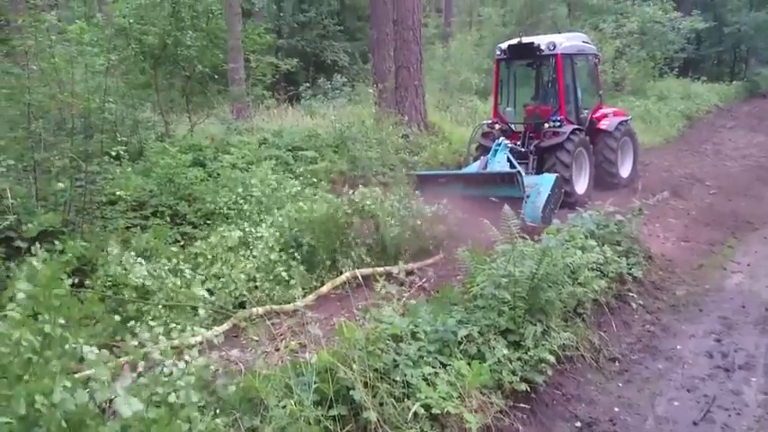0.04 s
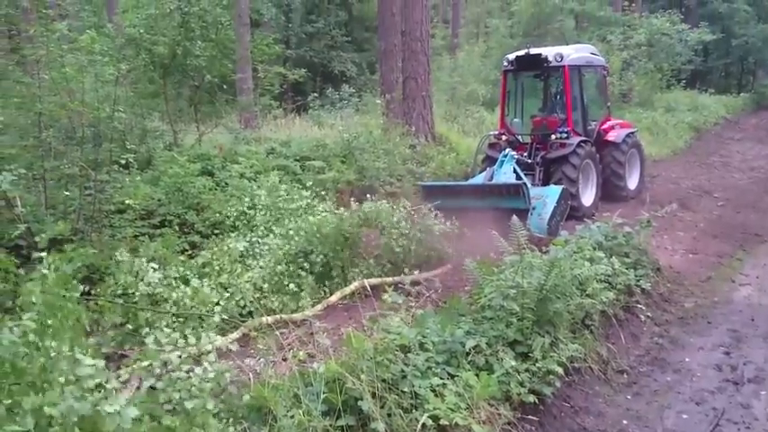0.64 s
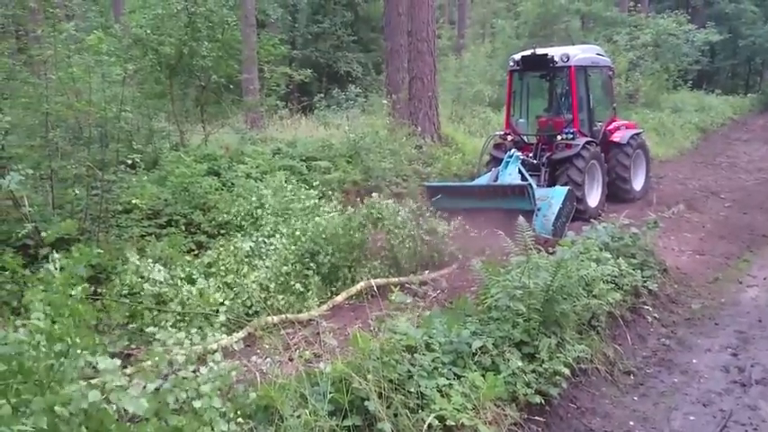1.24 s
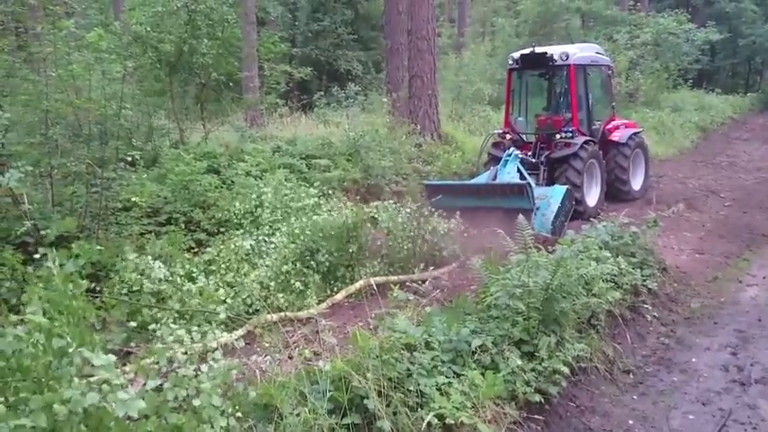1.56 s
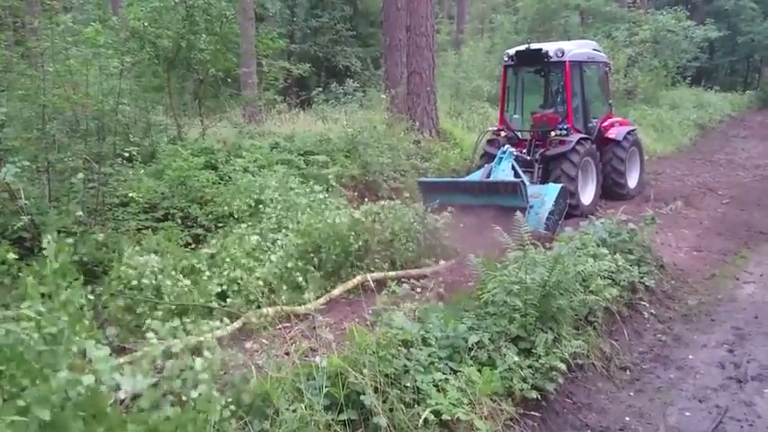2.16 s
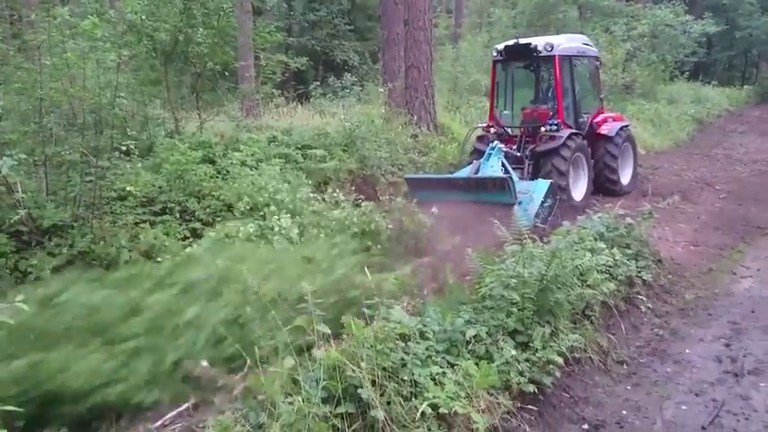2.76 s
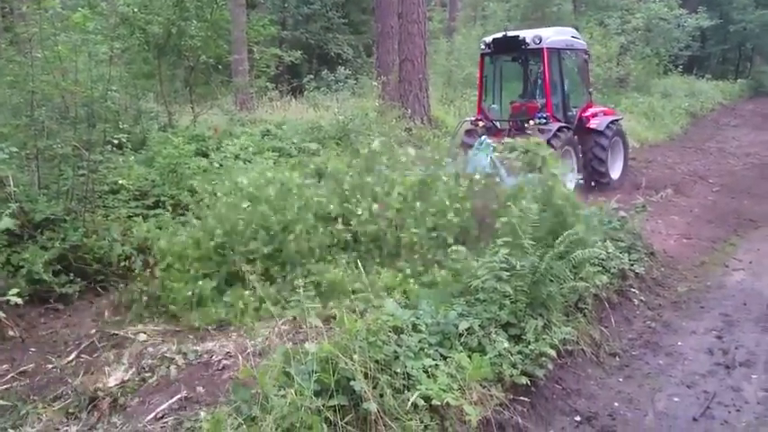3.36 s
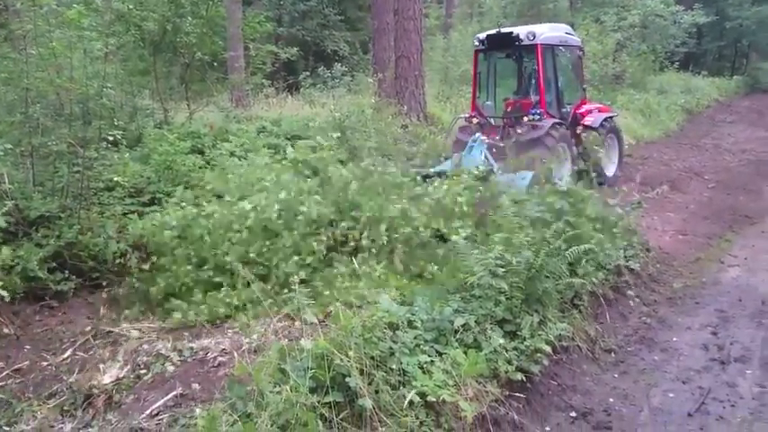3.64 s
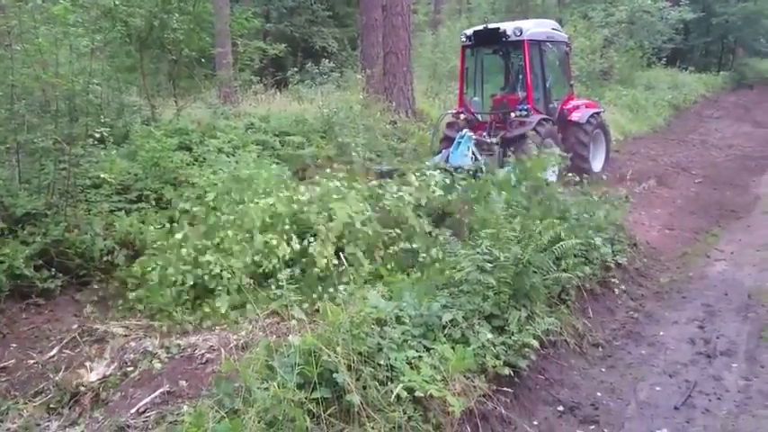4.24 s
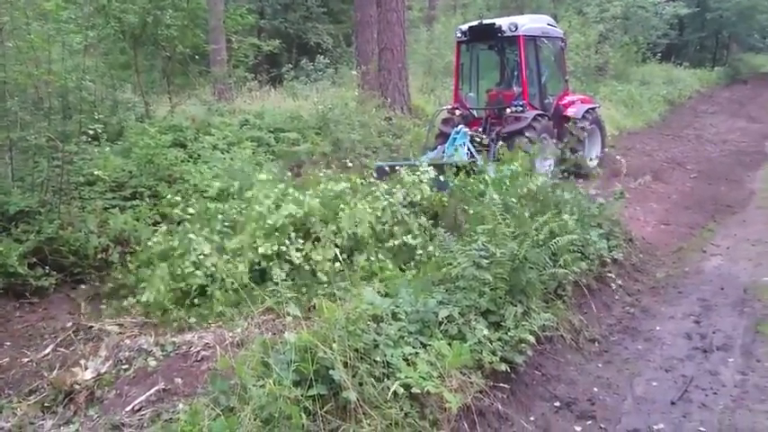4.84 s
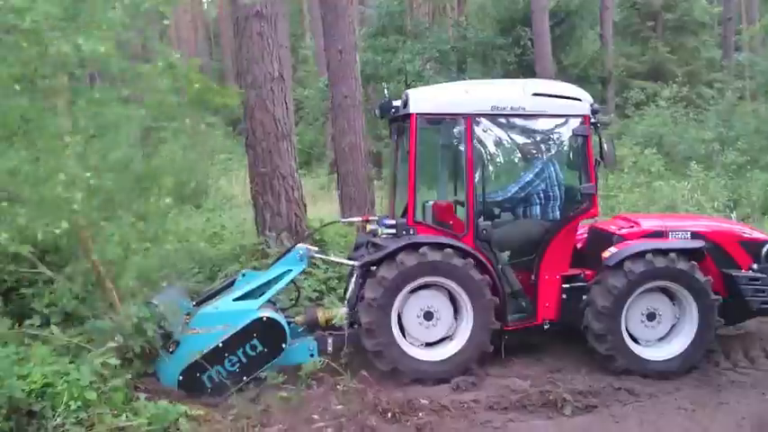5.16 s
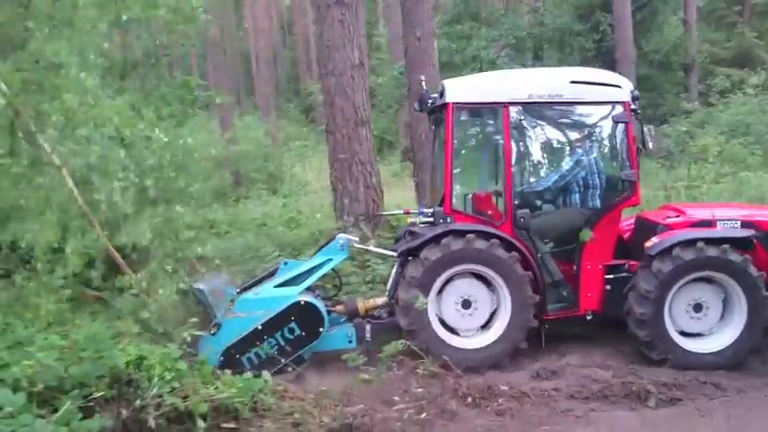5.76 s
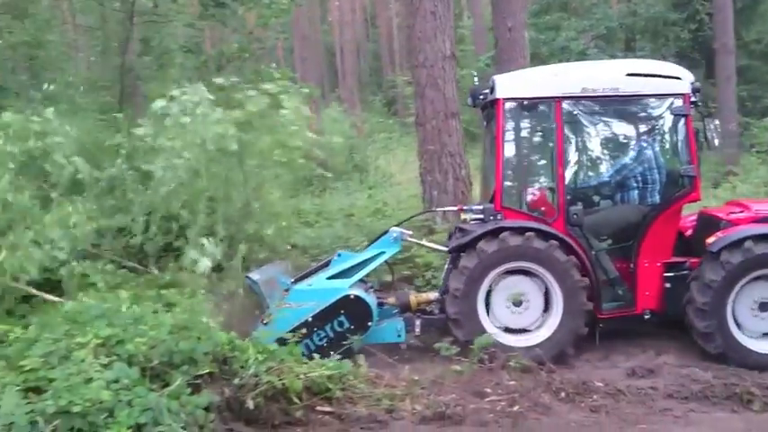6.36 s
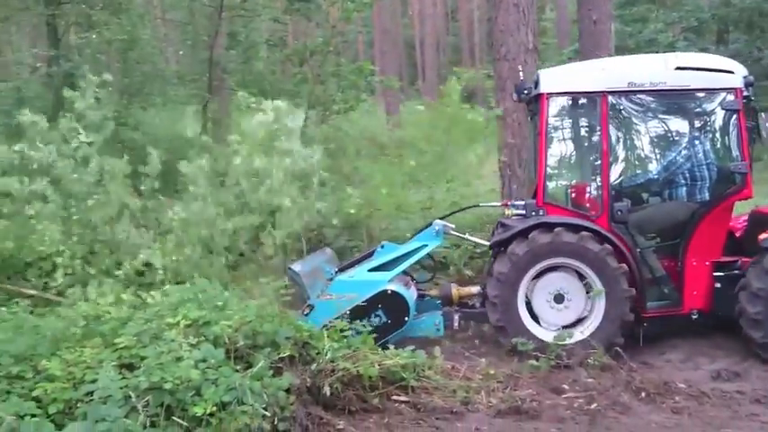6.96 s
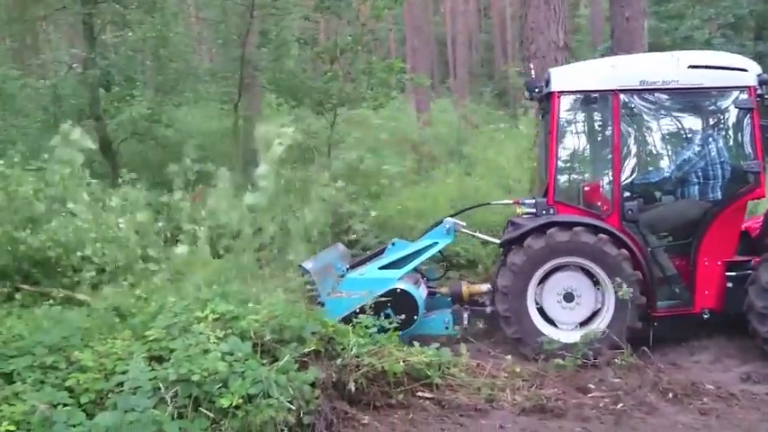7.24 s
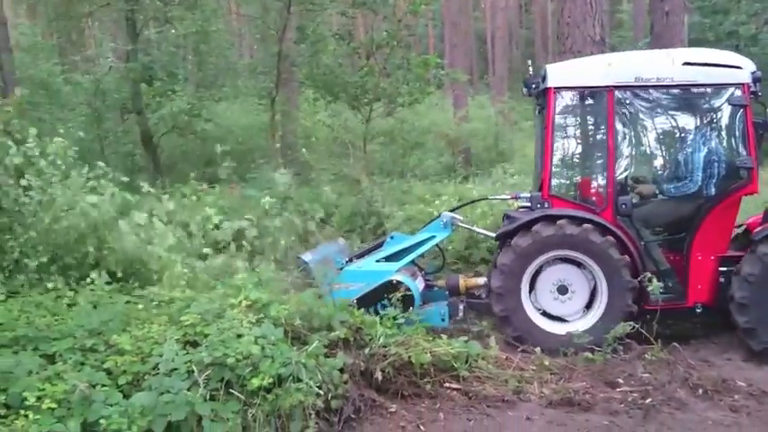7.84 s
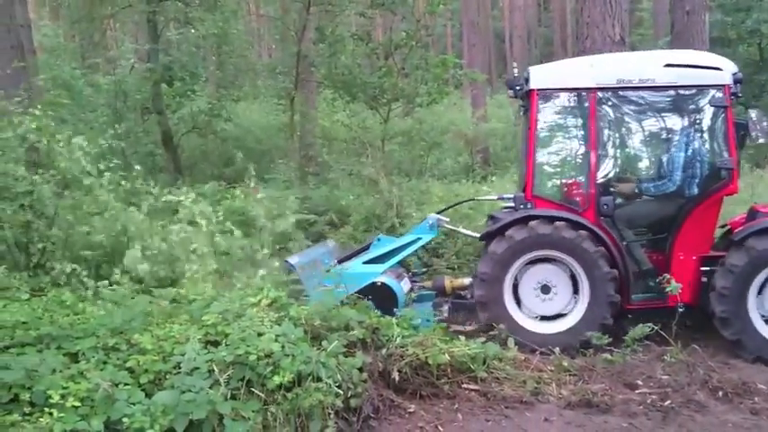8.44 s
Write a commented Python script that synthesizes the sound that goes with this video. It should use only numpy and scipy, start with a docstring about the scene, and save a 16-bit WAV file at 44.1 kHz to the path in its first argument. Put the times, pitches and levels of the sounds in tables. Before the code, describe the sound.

Heard from in front, a tractor's mulcher churns loudly through forest undergrowth, rattling, knocking and splintering wood over a throbbing diesel rumble. The pitch drops as it labours on a branch, with deep thumps and a gear whistle, then climbs back. After a short fade to silence, the microphone is close beside it: a steadier shredding roar, twigs cracking and ripping, and a hollow grinding in the dirt at the end.

```python
"""A small diesel tractor backs a belt-driven flail mulcher into forest brush, the rotor chopping twice
a turn. Around 1 s it draws in a long stick and knocks falling chirps out of it. At 2.5 s a leafy branch
chokes it: amid low booming pulses the engine labours, the gears whine, then the speed recovers. After 5 s
the sound fades out, to return from close beside the machine as a smoother roar with cracking wood and,
last, flails grinding in the soil. Throughout, the two channels are in opposite phase in the bass."""
import sys
import numpy as np
from scipy import signal
from scipy.fft import rfft, irfft, next_fast_len
from scipy.io import wavfile

SR = 44100
rng = np.random.default_rng(int(sys.argv[2]) if len(sys.argv) > 2 else 0)


def bounce(signal):
    """Save signal as a 16-bit WAV file at the path given by the first command-line argument."""
    frames = np.transpose(np.atleast_2d(signal))
    limited = np.clip(frames, -1, 1)
    pcm = np.round(limited * 32767).astype(np.int16)
    wavfile.write(sys.argv[1], SR, pcm)


N = 379701
TIME = np.arange(N) / SR
BESIDE = TIME > 5.4   # we listen from in front, then from beside the machine
FFT_SIZE = next_fast_len(N + 4096)
BIN_HZ = np.maximum(np.arange(FFT_SIZE // 2 + 1) * SR / FFT_SIZE, 1)

# Rotor speed, which engine and gears follow. Each row: time in seconds, turns per second.
ROTOR_SPEED = [(0.0, 25.57), (0.7, 25.88), (1.45, 25.58), (1.8, 25.29), (2.1, 25.44), (2.35, 24.52),
               (2.55, 24.12), (2.85, 20.55), (3.05, 20.45), (3.55, 21.07), (4.2, 24.66), (4.6, 26.25),
               (5.1, 25.54), (6.8, 25.49), (7.3, 25.38), (7.75, 25.47), (8.0, 25.91), (8.61, 25.64)]
# How hard the flails bite. Each row: time in seconds, share of the power that comes in chops (0-1).
BITE = [(0, 0.27), (1.0, 0.63), (1.55, 0.58), (1.95, 0.77), (2.4, 0.4), (2.6, 0.08), (3.7, .12), (4.4, .29),
        (5.0, 0.32), (6.2, 0.04)]
# The two banks of flails. Each row: place in the turn (0-1), relative force in dB on wood, on leaves.
FLAILS = [(.365, 16, 4), (0.885, 14, 4.5)]
# Clumps of brush torn up. Each row: start and hold in seconds, dB added to churn, dB added to wood.
CLUMPS = [(0.0, 0.26, -3.5, 0.5), (1.695, 0.24, 2.5, 1), (1.963, 0.42, -1.5, -0.5), (2.354, 0.072, 0, 0.5),
          (3.465, 0.14, -0.5, 0.2), (6.801, 0.0345, 0.5, 2), (7.062, 0.024, 1, 2), (7.237, 0.033, 3, 1),
          (7.447, 0.08, 1, 1.5), (7.752, 0.32, 2, -0.5), (8.201, .45, .5, -0.5)]
# Chips flung through the leaves. Each row: time in seconds, level in dB.
SPRAY_LEVEL = [(0.1, -27.5), (.3, -30), (.75, -30.5), (.95, -28.5), (1.2, -31.5), (1.45, -32), (1.83, -28),
               (2.2, -31.5), (2.8, -32.5), (3.22, -33), (3.45, -30), (5.1, -32), (6.25, -30.5), (6.8, -31),
               (6.98, -31), (7.5, -31), (7.75, -33), (8.6, -32.5)]
# Sticks snapping. Each row: time in seconds, relative level in dB of the crack, of the woody thud.
SNAPS = [(0.054, -6, -21.5), (0.134, -10.5, -23), (0.29, -7, -28.5), (0.484, -9.5, -19.5),
         (0.544, -10.5, -23), (0.715, -8, -14), (0.792, -8, -19), (0.934, -10.5, -28), (0.973, -7, -24),
         (1.321, -9, -25), (1.827, -4, -21), (1.869, -1, -16.5), (1.954, -1, -29), (1.991, -9, -18.5),
         (2.03, -2, -27.5), (2.07, 1, -27), (2.082, -13, -19), (2.12, -8, -10), (2.164, -12.5, -18),
         (2.202, -7.5, -12), (2.2255, -10, -12.5), (2.2415, -9.5, -9), (2.35, -2.5, -25),
         (2.3905, -3, -23.5), (2.427, -10, -23), (2.452, -8.5, -24.5), (4.9606, -12, -13.5),
         (4.998, -4.5, -21.5), (6.8308, -2.5, -18), (6.985, -9.5, -23), (7.054, -8, -23),
         (7.0685, -20, -21), (7.231, -7.5, -29), (7.343, -22.5, -16.5), (7.44, -6, -19)]
# Flail knocks. Each row: place in the turn (0-1), relative level in dB, low-pass corner in Hz.
KNOCKS = [(.012, 0, 2400), (.56, -4.5, 1100)]
# The colour of the stick's chirp. Each row: frequency in Hz, relative level in dB.
STICK_EQ = [(250, -20), (380, -14.5), (470, -1.5), (600, 4.5), (720, -10.5), (840, -4), (1200, -6.5),
            (1900, -8), (2400, -13), (3500, -30)]
# The hood's ring after a knock. Each row: pitch in Hz, T60 in seconds, dB against the chirp.
KNOCK_MODES = [(506, 0.036, -13), (573, .05, -9), (844, 0.051, -11), (1895, .04, -9)]
# Low booming pulses, mostly as the machine chokes on the branch. Each row: time in seconds, strength in dB.
BOOM_PULSES = [(2.431, -24.5), (2.478, -21.5), (2.578, -17), (2.612, -19.5), (2.762, -18), (2.863, -28.5),
               (2.974, -22.5), (6.582, -38.5)]
# Their deep ring. Each row: pitch in Hz, T60 in seconds, gain in dB.
BOOM_MODES = [(90.5, 0.11, 15.5), (119, 0.083, -1), (175, .05, -17)]
# Chunks of wood hitting the hood. Each row: time in seconds, strength in dB.
CLONKS = [(1.77, -15), (1.79, -15), (2.13, -17.5), (2.29, -15), (2.368, -13), (2.474, -12.5),
          (2.585, -18.5), (2.794, -20), (2.822, -15.5), (3.017, -17.5)]
# Their short midrange ring. Each row: pitch in Hz, T60 in seconds, gain in dB.
CLONK_MODES = [(430, .03, -4), (520, .04, 4.5), (576, .03, -6)]
# Green twigs ripping. Each row: time in seconds, level in dB before the high-pass, decay in seconds.
RIPS = [(0.933, -23, 0.005), (6.826, -25, 0.0079), (7.232, -23.5, 0.017), (7.445, -26.5, 0.024),
        (8.19, -26.5, 0.0062)]
# Flails in the soil. Each row: start and hold in seconds, level in dB, hood resonance in Hz.
GRINDS = [(7.775, .03, -22, 740), (8.0, .55, -23, 610), (8.17, .06, -17.5, 585), (8.345, .03, -21, 570)]
# The exhaust note, riding the engine's load. Each row: time in seconds, level in dB.
EXHAUST_LEVEL = [(0, -25.5), (.58, -25), (.85, -33), (1.4, -30.5), (2.1, -26), (2.8, -23), (3.05, -22.5),
                 (3.65, -21.5), (4.3, -23), (4.75, -39), (6.3, -27.5), (6.9, -30), (7.65, -29.5),
                 (8.0, -42), (8.6, -37)]
# Rotor hum. Each row: multiple of the turn rate, relative dB at top speed, dB lost per dB of lost speed.
HUM_PARTIALS = [(2, -18, 0), (3, -8, 4), (4, -3.5, 0), (5, -9.5, 0), (6, 0, 3.5), (7, -12, 2), (8, -9, 2),
                (9, -16, 3), (10, -16, 4), (11, -16, 5), (12, -13, 6), (15, -11, 9)]
# Gear tones. Each row: multiple of the firing rate, phase wander in cycles, relative dB in front, beside.
GEAR_TONES = [(4.82, .02, -36, 0), (7, .05, -6, -12), (10.14, .11, -32, -1), (15, .04, -12, -.5),
              (15.4, .1, -26, .5), (45, .1, -24, -11)]
# A gear whistle that swells and sinks. Each row: time in seconds, level in dB.
WHISTLE_LEVEL = [(0.1, -38), (2.55, -43), (2.7, -29.5), (2.88, -20.5), (3.12, -23.5), (3.5, -24.5),
                 (3.8, -28.5), (4.05, -25), (4.25, -30), (4.5, -30), (5.1, -35), (6.25, -27.5),
                 (6.7, -29.5), (7.2, -26), (7.42, -25.5), (7.54, -36), (7.68, -22), (7.95, -30),
                 (8.38, -34), (8.55, -28)]
# EQ curves of the four noise layers. Each row: frequency in Hz, relative level in dB in front, beside.
HOOD_EQ = [(320, -11, -3), (448, -1.5, -6), (506, -1.5, 3), (591, -3, 5.5), (730, -7.5, 0.5), (900, 0, -1),
           (890, -3, -7), (1130, -2.5, 0), (1365, -3, 0.5)]
WOOD_EQ = [(1340, -1.5, -14.5), (1440, -3, -9), (1740, 1, -5), (2180, 0, -7), (2320, -1.5, -8.5),
           (2640, -3, -8), (3200, -8, -9), (3890, -12, -13.5), (4070, -37, -18)]
SPRAY_EQ = [(3780, -4, -2), (4850, -5, -5.5), (6130, -10, -7.5), (8500, -7.5, -10), (9000, -7, -11),
            (10550, -10.5, -11), (12500, -10.5, -11.5), (14870, -8, -8)]
RUMBLE_EQ = [(25.1, -25, -20), (45, -7.5, -9.5), (65.6, -10, -6.5), (89, -6.5, -1.5), (128.6, -2, -2),
             (193, -6, -2), (272, -11, -0.5), (331, -9.5, -29)]
# Left channel against right. Each row: frequency in Hz, gain in dB in front, beside.
LEFT_BALANCE = [(61.6, -3.5, -4), (400, -5, -6), (1040, -5, -4), (1370, -6.5, -5), (1780, -14, -7.5),
                (2260, -17.5, -17), (3020, -4.5, -13.5), (3756, 0, -3.5), (4740, -2, -0.5),
                (5340, 8.5, 5.5), (6450, 12, 13), (7700, 10.5, 10), (8950, 2.5, 7), (10040, 10, 4),
                (11030, -7, 1.5), (12400, -0.5, -13), (14730, -22, -10)]
# How alike the channels are. Each row: frequency in Hz, likeness (0-1) in front, beside.
LEFT_LIKENESS = [(60, 0.99, 1), (600, 1, 0.96), (930, 0.96, 0.47), (1350, 0.86, 0.68), (1600, 1, 0.32),
                 (2300, 0.13, 0.12), (3640, 0.6, 0.082), (6000, 0.07, 0.08), (14940, 0, .08)]
# The left channel's lead. Each row: frequency in Hz, phase in radians (held to at least pi in use).
LEFT_PHASE = [(0, -10.5), (260, 3.5), (1380, 3.5), (1720, 4), (2240, 4), (3530, 7), (3880, 8.5), (4480, 3),
              (4820, 5), (5250, 10.5), (5940, 17), (7060, 26), (8610, 24), (10100, 6), (11700, 37),
              (16600, 52)]

# Layer faders. Each row, in dB: in scrub, in the branch, from beside, added by full labour, by the choke.
CHURN_DB = (-16.5, -20, -18.5, -3, -6.5)
WOOD_DB = (-18, -19, -20, 0.5, -7.5)
KNOCK_DB = (-24, -38, -37, -7.5, 0)
HUM_DB = (-38.5, -21.5, -32, -4, 3.5)
WHINE_DB = (-35.5, -35.5, -34, 12.5, -11.5)
RUMBLE_DB = (-25.5, -25, -24.5, 2.5, -6)


def mulcher(turn, speed):
    """The flails churn brush under the hood, tear wood and spray chips through the leaves."""
    churn_db, wood_db, knock_db = brush_levels(speed)
    spray_db, = in_time(SPRAY_LEVEL)
    _, on_wood_db, on_leaves_db = np.transpose(FLAILS)
    feed = from_db(.5 * drift(45) + 0.74 * drift(9))
    chopping = feed * chops(turn, on_wood_db, spread_db=0.5, decay_s=0.0036)
    flinging = feed * chops(turn, on_leaves_db, spread_db=4.5, decay_s=0.0037)
    debris = noise() + 0.33 * splinters(per_s=110, spread_db=2.0)
    churn = colour(debris * chopping * from_db(0.59 * drift(25)), HOOD_EQ)
    cracks, thuds = snapping_sticks()
    wood = from_db(wood_db) * chopping * (noise() + 0.51 * splinters(per_s=220, spread_db=1.0))
    spray = from_db(spray_db) * flinging * (noise() + 0.3 * splinters(per_s=300, spread_db=-6.5))
    body = from_db(churn_db) * churn + from_db(knock_db) * stick_knocks(turn) + from_db(15) * thuds
    booms = butter(ringing_pulses(BOOM_PULSES, BOOM_MODES), 4, 75, "high")
    clonks = butter(ringing_pulses(CLONKS, CLONK_MODES), 2, 300, "high")
    mids = colour(wood + from_db(-7) * cracks, WOOD_EQ)
    highs = colour(spray + from_db(-24) * cracks, SPRAY_EQ)
    return body + booms + clonks + mids + highs + ripping_twigs() + soil_grind()


def brush_levels(speed):
    """Faders in dB for churn, wood and knocks, as clumps and the long stick go in."""
    churn_db, wood_db, knock_db = levels(speed, CHURN_DB, WOOD_DB, KNOCK_DB)
    for start_s, hold_s, more_churn_db, more_wood_db in CLUMPS:
        clump = bout(start_s, hold_s, rise_s=0.021, fall_s=0.096)
        churn_db += more_churn_db * clump
        wood_db += more_wood_db * clump
    # the stick takes the knocks and keeps other brush out
    stick = bout(start_s=0.78, hold_s=.82, rise_s=0.42, fall_s=0.42)
    return churn_db - 5.5 * stick, wood_db - 1.5 * stick, knock_db + 8 * stick


def chops(turn, banks_db, spread_db, decay_s, jitter_s=.0007):
    """Shredding gain: a steady bed, and two banks of flails each biting once a turn with uneven force."""
    blows = 0
    for (place, *_), bank_db in zip(FLAILS, banks_db):
        times = passings(turn, place)
        late, force = rng.standard_normal((len(times), 2)).T
        blows += clicks(times + jitter_s * late, from_db(bank_db + spread_db * np.tanh(force)) ** 2)
    power = np.abs(swell(blows, decay_s))
    bite, = in_time(BITE)
    return np.sqrt(1 - bite + bite * power / power.mean())


def splinters(per_s, spread_db):
    """A crackle of twigs breaking at random, uneven in size; rms 1."""
    breaks = rng.random(N) < per_s * from_db(4 * drift(9)) / SR
    sizes = from_db(spread_db * np.minimum(rng.exponential(1, N), 4))
    return rms_one(bursts(breaks * sizes ** 2, decay_s=0.0002))


def snapping_sticks():
    """Each stick breaks with a broadband crack and a woody thud, returned as two layers."""
    times, crack_db, thud_db = np.transpose(SNAPS)
    cracks = bursts(clicks(times, from_db(crack_db) ** 2), decay_s=0.0025)
    thuds = bursts(clicks(times, from_db(thud_db) ** 2), decay_s=0.0026)
    return cracks, butter(thuds, 2, [800, 1500], "band")


def stick_knocks(turn, spread_db=1.8, jitter_s=.00003, travel_s_at_1khz=.011):
    """High bending waves outrun low ones along the stick: each knock chirps down and rings the hood."""
    force_db = spread_db * rng.standard_normal(len(passings(turn, 0)))
    blows = 0
    for place, db, dull_hz in KNOCKS:
        times = passings(turn, place)
        delays = jitter_s * rng.standard_normal((len(times), 2)).T
        hits = np.array([clicks(times + late_s, from_db(db + force_db)) for late_s in delays])
        blows += rfft(hits, FFT_SIZE) / np.sqrt(1 + (BIN_HZ / dull_hz) ** 4)
    dispersion = np.exp(-4j * np.pi * travel_s_at_1khz * np.sqrt(1000 * BIN_HZ))
    chirps = rms_one(irfft(blows * dispersion * from_db(in_pitch(STICK_EQ)[0]), FFT_SIZE)[:, :N])
    rings = sum(from_db(db) * rms_one(ring(chirps, hz, t60)) for hz, t60, db in KNOCK_MODES)
    knocks = chirps + rings + from_db(-9) * hood_clatter(turn, force_db)
    return rms_one(butter(knocks, 2, 300, "high"))   # the knocks carry no bass


def hood_clatter(turn, force_db, t60=0.064):
    """The sheet steel's many weaker modes clatter once a turn; rms 1."""
    age = TIME[:SR // 8]
    dense_modes = rng.standard_normal((2, len(age))) * from_db(-60 * age / t60)
    hits = clicks(passings(turn, FLAILS[0][0]), from_db(force_db))
    clatter = signal.fftconvolve(hits[None], dense_modes)[:, :N]
    return rms_one(butter(clatter, 2, [600, 2400], "band"))


def ringing_pulses(pulses, modes):
    """Each pulse rings briefly at the given pitches: a low boom or a midrange clonk."""
    times, strength_db = np.transpose(pulses)
    return sum(ring(clicks(times, from_db(strength_db + db)), hz, t60) for hz, t60, db in modes)


def ripping_twigs():
    """Green twigs tear in short, bright bursts of tiny fibre cracks."""
    power = sum(swell(clicks(np.array([s]), from_db([db]) ** 2), decay_s) for s, db, decay_s in RIPS)
    fibres = rms_one(noise() + 0.31 * splinters(per_s=670, spread_db=5.0))
    return butter(fibres * np.sqrt(np.abs(power)), 2, 4500, "high")


def soil_grind():
    """Soil and chips scour the hood in surges and keep up a hollow drone."""
    grit = noise()
    drone = 0
    for start_s, hold_s, db, hz in GRINDS:
        surge = from_db(db) * bout(start_s, hold_s, rise_s=.045, fall_s=.045)
        drone += surge * rms_one(ring(grit, hz, t60=.02))
    return butter(drone, 4, 450, "high")


def tractor(turn, speed, firings_per_turn=3.39):
    """Exhaust note, whining gears, rotor hum, and a rumble that throbs with the firings."""
    hum_db, whine_db, rumble_db = levels(speed, HUM_DB, WHINE_DB, RUMBLE_DB)
    firing = firings_per_turn * turn
    tones = exhaust(firing) + gears(turn, firing, whine_db)
    throb = 1 + 0.28 * np.cos(2 * np.pi * firing)
    rumble = colour(noise() * throb * from_db(0.91 * drift(13)), RUMBLE_EQ)
    return tones + from_db(hum_db) * rotor_hum(turn) + from_db(rumble_db) * rumble


def exhaust(firing):
    """The firings make a low note and its octave, which is stronger from beside."""
    level_db = in_time(EXHAUST_LEVEL)[0] + 0.46 * drift(22)
    note = tone(firing + .012 * drift(20))
    octave = from_db(np.where(BESIDE, -2, -13)) * tone(2 * firing + .05 * drift(20))
    return from_db(level_db) * (note + octave)


def gears(turn, firing, whine_db, whistle_per_firing=30, beat_hz=9.45):
    """The gears whine, whistle and briefly groan, fluttering with each turn of the rotor."""
    whine = 0
    for multiple, wander, front_db, beside_db in GEAR_TONES:
        partial = tone(multiple * firing + wander * drift(45))
        whine += partial * from_db(np.where(BESIDE, beside_db, front_db) + 2.4 * drift(22))
    beat = 1 + .35 * np.cos(2 * np.pi * beat_hz * TIME)
    whistle = beat * tone(whistle_per_firing * firing + .11 * drift(70) + .09 * drift(25))
    whistle *= from_db(in_time(WHISTLE_LEVEL)[0] + 1.8 * drift(50))
    # an octave under the whistle, as the engine starts to recover
    groan_gain = from_db(-30) * bout(start_s=3.36, hold_s=.2, rise_s=.12, fall_s=.12)
    groan = groan_gain * tone(whistle_per_firing / 2 * firing + .08 * drift(45))
    flutter = 1 + 0.31 * np.cos(2 * np.pi * turn)
    return flutter * (from_db(whine_db) * whine + whistle + groan)


def rotor_hum(turn):
    """The unbalanced rotor shakes the frame; most of its overtones die away as it slows."""
    top_speed = max(speed for _, speed in ROTOR_SPEED)
    slowed_db = 20 * np.log10(np.gradient(turn) * SR / top_speed)
    hum = 0
    for multiple, db, steepness in HUM_PARTIALS:
        partial = tone(multiple * turn + rng.random() + .025 * drift(7))
        hum += partial * from_db(db + steepness * slowed_db + 1.2 * drift(4))
    return hum


def levels(speed, *faders, branch_s=2.463, entry_s=0.083, choke_s=0.24, clear_s=0.48):
    """Ride each fader in dB as the branch enters, chokes the rotor and is slowly cleared."""
    since = TIME - branch_s
    in_branch = np.clip(since / entry_s, 0, 1)
    choke = np.clip(since / choke_s, 0, 1) * np.exp(-np.maximum(since - choke_s, 0) / clear_s)
    labour = np.tanh((27.3 - speed) / 8.4)   # grows below the free speed, 27.3 turns per second
    return [np.where(BESIDE, beside, scrub + (branch - scrub) * in_branch)
            + by_labour * labour + by_choke * choke
            for scrub, branch, beside, by_labour, by_choke in faders]


def stereo(direct, scattered):
    """Right is the direct sound; left is turned in phase, mixed with scatter and given its own colour."""
    lead = np.maximum(in_pitch(LEFT_PHASE)[0], np.pi)
    turned = rfft(direct, FFT_SIZE) * np.exp(1j * lead)
    diffuse = rfft(scattered, FFT_SIZE)
    spectra = [from_db(db) * (alike * turned + np.sqrt(1 - alike ** 2) * diffuse)
               for db, alike in zip(in_pitch(LEFT_BALANCE), in_pitch(LEFT_LIKENESS))]
    front, beside = irfft(spectra, FFT_SIZE)[:, :N]
    return np.array([np.where(BESIDE, beside, front), direct])


def colour(x, eq):
    """Apply each standpoint's EQ, with steep ends; white noise keeps its rms."""
    ends = 1 / np.sqrt((1 + (eq[0][0] / BIN_HZ) ** 20) * (1 + (BIN_HZ / eq[-1][0]) ** 20))
    spectrum = rfft(x, FFT_SIZE)
    gains = [rms_one(ends * from_db(db)) for db in in_pitch(eq)]
    front, beside = [irfft(spectrum * gain, FFT_SIZE)[..., :N] for gain in gains]
    return np.where(BESIDE, beside, front)


def passings(turn, place):
    """The times at which the rotor passes a place in its turn."""
    return np.interp(np.arange(230) + place, turn, TIME, right=N)


def clicks(times, sizes):
    """One click of each size at each time."""
    return np.bincount(np.clip(np.round(times * SR).astype(int), 0, N), sizes, N + 1)[:N]


def swell(x, decay_s):
    """Each click becomes a quick rise and slower fall of about its own height."""
    fall, rise = np.exp(-1 / (decay_s * SR)), np.exp(-3 / (decay_s * SR))
    return 2.6 * signal.lfilter([0, fall - rise], [1, -fall - rise, fall * rise], x + 1e-18)


def bursts(powers, decay_s):
    """Each click opens a burst of noise of about that power."""
    return noise() * np.sqrt(np.abs(swell(powers, decay_s)))


def ring(x, hz, t60):
    """A unit click sets a sine of height 1 ringing."""
    radius, angle = from_db(-60 / (t60 * SR)), 2 * np.pi * hz / SR
    return signal.lfilter([0, np.sin(angle)], [1, -2 * radius * np.cos(angle), radius ** 2], x + 1e-18)


def bout(start_s, hold_s, rise_s, fall_s):
    """An envelope that reaches 1 at the start time, holds and falls."""
    return np.clip(np.minimum((TIME - start_s) / rise_s, (start_s + hold_s - TIME) / fall_s) + 1, 0, 1)


def tone(cycles):
    """A sine of rms 1, direct and scattered a quarter cycle apart."""
    return np.sqrt(2) * np.array([np.sin(2 * np.pi * cycles), np.cos(2 * np.pi * cycles)])


def noise():
    """White noise, direct and scattered."""
    return rng.standard_normal((2, N))


def drift(per_s):
    """A random wobble of rms 1, gliding to a new value so many times a second."""
    return rms_one(np.interp(TIME * per_s, np.arange(4096), rng.standard_normal(4096)))


def in_time(rows):
    """The columns of a curve at every sample."""
    times, *columns = np.transpose(rows)
    return [np.interp(TIME, times, c) for c in columns]


def in_pitch(rows):
    """The columns of a spectrum at every frequency bin."""
    hz, *columns = np.transpose(rows)
    return [np.interp(np.log(BIN_HZ), np.log(np.maximum(hz, 1)), c) for c in columns]


def butter(x, order, hz, kind):
    """A filter with a flat passband."""
    return signal.sosfilt(signal.butter(order, hz, kind, fs=SR, output="sos"), x)


def from_db(db):
    """Decibels to gain."""
    return 10 ** (np.asarray(db) / 20)


def rms_one(x):
    """Scale to rms 1."""
    return x / np.sqrt(np.mean(x ** 2) + 1e-20)


def scene():
    """Tractor and mulcher follow one speed curve."""
    speed, = in_time(ROTOR_SPEED)
    turn = -.12 + np.cumsum(speed) / SR   # rotor position in turns
    return stereo(*(tractor(turn, speed) + mulcher(turn, speed)))


def record(dry, silent_from_s=5.132, silent_to_s=5.628, cutoff_hz=16000):
    """Round the peaks, fade out and back in between the standpoints, and cut the very top."""
    fade_out = np.clip((silent_from_s - TIME) / 0.076, 0, 1) ** 1.1
    fade_in = np.clip((TIME - silent_to_s) / 0.61, 0, 1) ** 2.11
    faded = 1.26 * np.tanh(dry / 1.245) * (fade_out + fade_in)
    return signal.sosfilt(signal.ellip(12, .1, 80, cutoff_hz, fs=SR, output="sos"), faded + 1e-18)


dry = scene()
out = record(dry)
bounce(out)
```